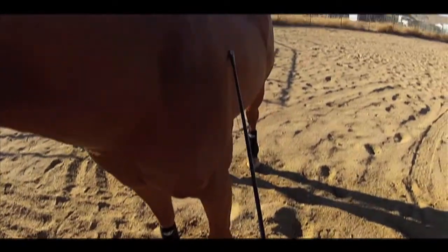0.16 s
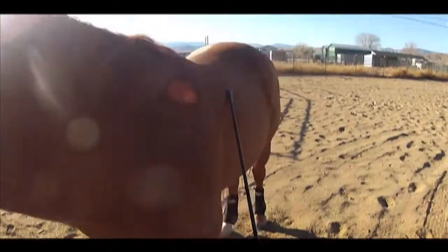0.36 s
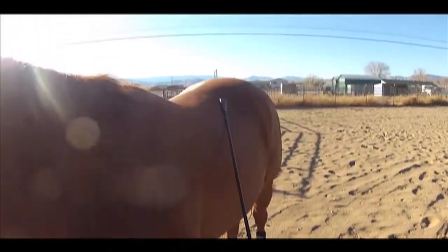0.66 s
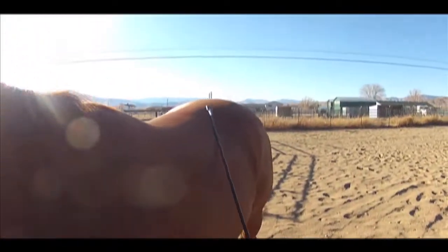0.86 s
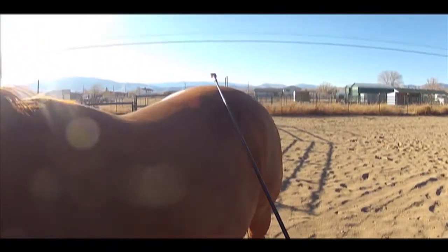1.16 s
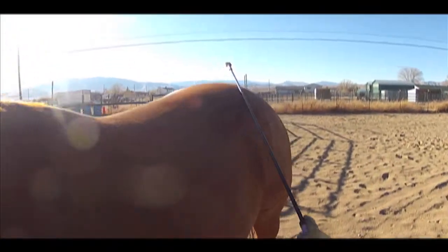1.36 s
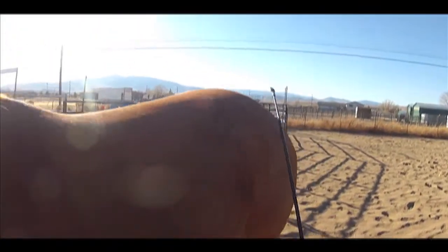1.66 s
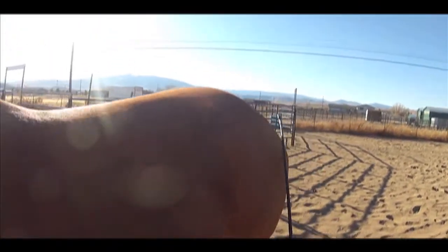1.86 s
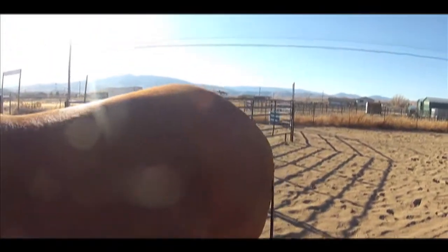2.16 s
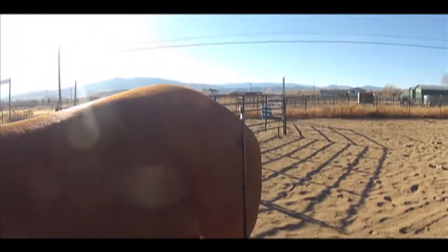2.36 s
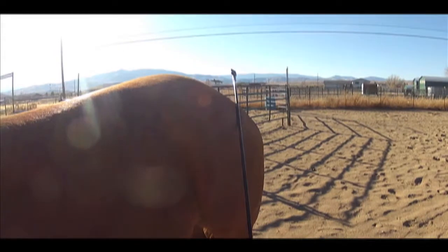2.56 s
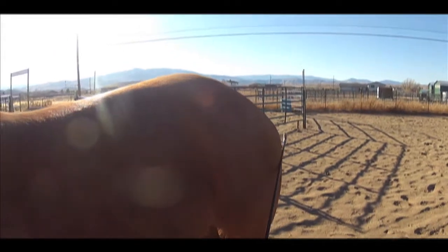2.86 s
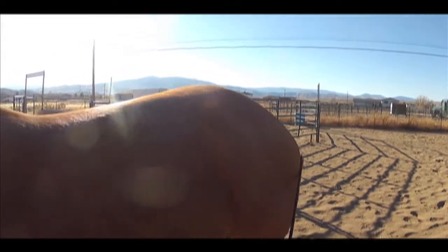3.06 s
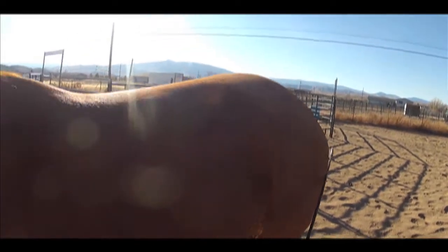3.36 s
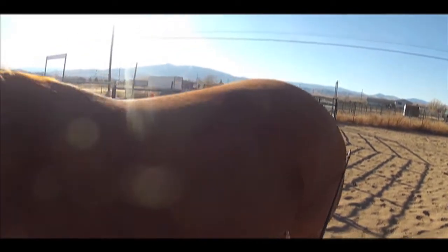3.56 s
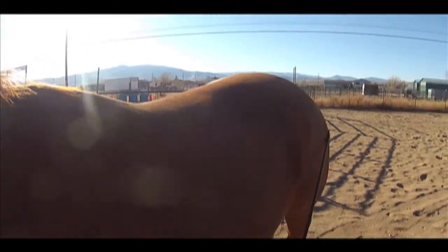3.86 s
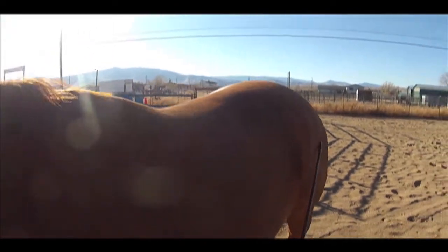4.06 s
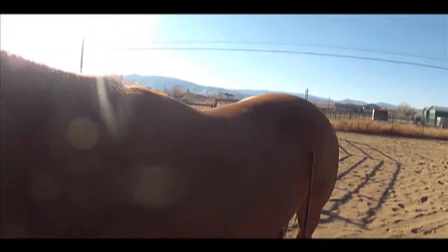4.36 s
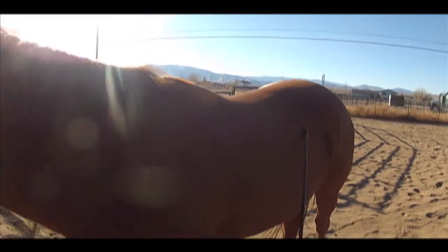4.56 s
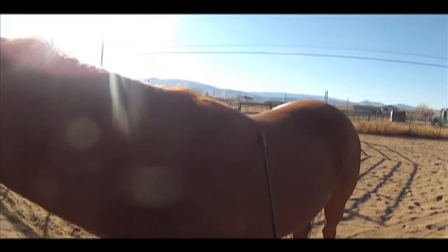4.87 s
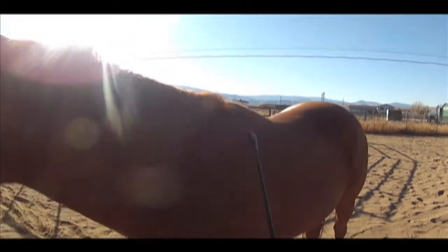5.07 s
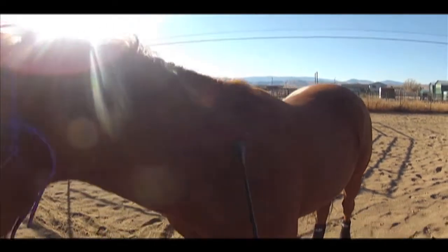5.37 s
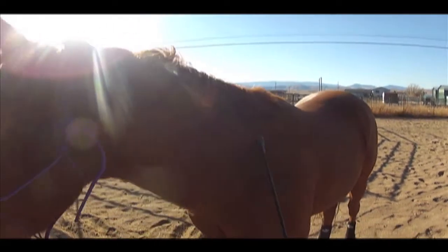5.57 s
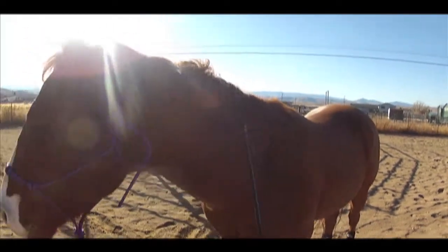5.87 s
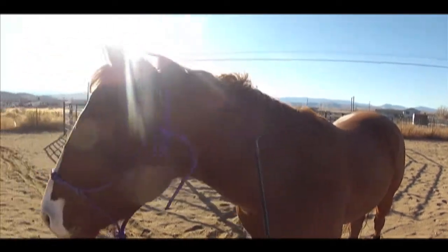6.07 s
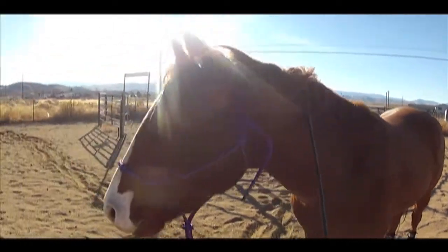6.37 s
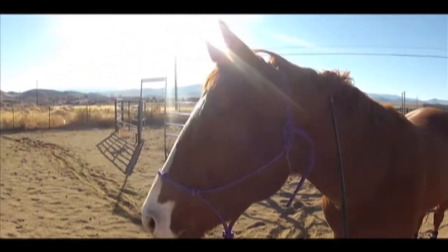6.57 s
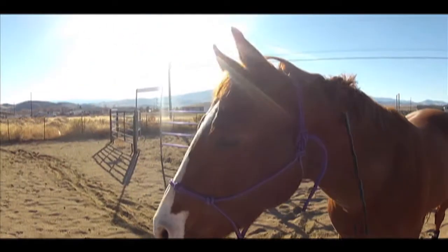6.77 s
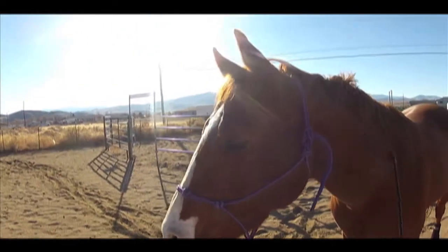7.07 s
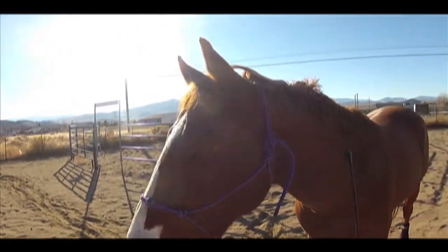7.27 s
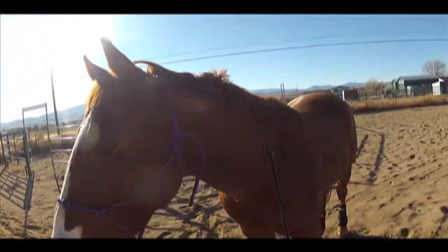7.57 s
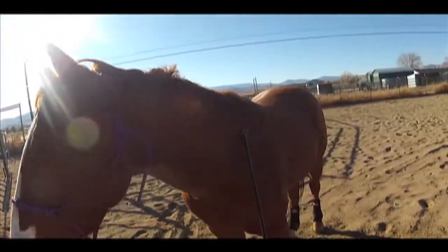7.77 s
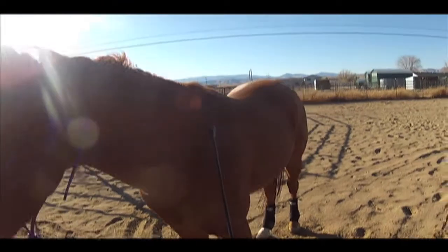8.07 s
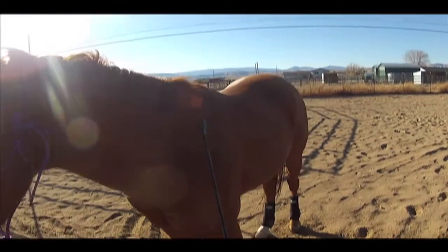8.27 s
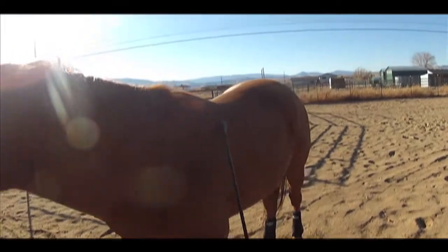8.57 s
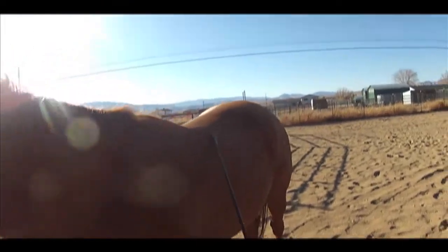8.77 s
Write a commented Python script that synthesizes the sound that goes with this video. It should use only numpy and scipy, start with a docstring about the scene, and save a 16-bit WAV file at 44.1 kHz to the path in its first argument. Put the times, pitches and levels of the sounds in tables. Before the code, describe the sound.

Low wind rumble and muffled thumps come in uneven gusts, while a horse's halter clicks faintly over a steady hiss.

```python
"""Gusty wind buffets the microphone port of a small camera in a closed case, out in a sandy arena.
The strongest eddies strike the microphone as dull thuds, perhaps with a hoof among them.
A horse shifts about close by, knocks come through the case, and the halter's metal clicks.
Far off are a chipping bird and faint rasps; a few soft tones sound over a steady hiss.
The camera holds each sample of a slow converter, which mirrors the sound into the treble."""
import numpy as np
from scipy import signal
from scipy.fft import rfft, irfft, next_fast_len
from scipy.ndimage import uniform_filter1d, map_coordinates
import sys
import numpy as np
from scipy import signal
from scipy.fft import rfft, irfft, next_fast_len
from scipy.io import wavfile
from scipy.ndimage import uniform_filter1d, map_coordinates

SR = 44100
rng = np.random.default_rng(int(sys.argv[2]) if len(sys.argv) > 2 else 0)


def master(y):
    """Save y as 16-bit WAV."""
    cut = np.clip(np.atleast_2d(y).T, -1, 1)
    pcm = np.round(cut * 32767)  # scale
    wavfile.write(sys.argv[1], SR, pcm.astype(np.int16))


N = 393813
TIME = np.arange(N) / SR


def amp(db):
    """Decibels to gain."""
    return 10 ** (np.asarray(db) / 20)


def unit(x):
    """x scaled to rms 1."""
    return x / np.sqrt(np.mean(x ** 2) + 1e-20)


def wobble(rate):
    """A smooth random curve, rate knots a second."""
    return map_coordinates(rng.standard_normal(int(N * rate / SR) + 4), [TIME * rate])


def filtered(x, response):
    """x weighted by response, a gain for each frequency in Hz."""
    size = next_fast_len(N + SR // 2)
    return irfft(rfft(x, size) * response(np.fft.rfftfreq(size, 1 / SR)), size)[:N]


def coloured(x, spectrum):
    """x shaped by (Hz, dB) points on a log axis, at rms 1."""
    freqs, db = np.transpose(spectrum)
    return unit(filtered(x, lambda hz: amp(np.interp(np.log(hz + 1), np.log(freqs), db, right=-200))))


def steady(x, size, share):
    """Evens out a share of a noise's chance swells over size samples, at rms 1."""
    power = np.abs(uniform_filter1d(x ** 2, size=size))
    return unit(x / (power + 0.12) ** (share / 2))


def add(track, start, sound):
    """Mixes a sound into the track at start seconds, or at 0 if that is negative."""
    part = track[max(round(start * SR), 0):][:len(sound)]
    part += sound[:len(part)]


# Gusts at the microphone. Each row: time in seconds, wind strength in dB.
GUST_CURVE = [(0, -22), (.18, -15.5), (.52, -18.5), (.58, -28), (.94, -32), (1.02, -18.5), (1.3, -23.5),
              (1.35, -28), (1.6, -23), (1.68, -30.5), (1.93, -30.5), (2.1, -39.5), (2.26, -32.5),
              (2.7, -44.5), (2.9, -35), (3.32, -44.5), (3.41, -34), (3.84, -36.5), (3.92, -46),
              (4.08, -40.5), (4.5, -26), (4.65, -36), (4.88, -27.5), (4.98, -39.5), (5.53, -29), (5.6, -25),
              (5.9, -20), (6.2, -27.5), (6.55, -33), (7.0, -29), (7.84, -27.5), (7.98, -12), (8.3, -14.5),
              (8.539, -20), (8.62, -34), (8.93, -30.5)]
# Rumble of the large eddies. Each row: frequency in Hz, relative level in dB.
BUFFET_SPECTRUM = [(12, -27.5), (25, -10), (55, -1), (110, -3.5), (170, -9.5), (260, -25.5), (500, -64),
                   (900, -120)]
# Flutter of the small eddies. Each row: frequency in Hz, relative level in dB.
FLUTTER_SPECTRUM = [(60, -53.5), (150, 0), (220, 0.5), (330, -7.5), (500, -21), (700, -30), (950, -50.5),
                    (1400, -53), (2500, -120)]


def wind():
    """Eddies strike the microphone port in lumps; small quick ones flutter on top of large slow ones."""
    eddy_depth_db, breeze_db, breeze_flutter_db, flutter_floor_db = 1.27, -30, -43, -55
    flutter_growth = 1.36  # dB per dB of wind
    lumps = wobble(35)
    buffet_db = np.interp(TIME, *np.transpose(GUST_CURVE)) + eddy_depth_db * wobble(17)
    flutter_db = breeze_flutter_db + flutter_growth * (buffet_db - breeze_db) + 1.3 * wobble(22)
    buffet = coloured(amp(2.0 * lumps) * rng.standard_normal(N), BUFFET_SPECTRUM)
    flutter = coloured(amp(1.9 * lumps + 2.9 * wobble(80)) * rng.standard_normal(N), FLUTTER_SPECTRUM)
    stirred_buffet, stirred_flutter = stirred_air()
    buffet_gain = np.sqrt(amp(buffet_db) ** 2 + stirred_buffet)
    flutter_gain = np.sqrt(amp(flutter_db) ** 2 + amp(flutter_floor_db) ** 2 + stirred_flutter)
    pressure = buffet_gain * steady(buffet, size=2600, share=0.46)
    pressure += flutter_gain * steady(flutter, size=2000, share=0.49)
    power = uniform_filter1d(pressure ** 2, size=1500)
    skew = (pressure ** 2 - power) / np.sqrt(np.abs(power) + 1e-12)  # pushes peak sharper than pulls
    return pressure + 0.15 * skew


# Distant air and the camera's circuit hiss. Each row: frequency in Hz, relative level in dB.
HISS_SPECTRUM = [(150, -26), (400, 4), (700, -0.5), (1100, -8), (1700, -10.5), (3000, -13), (4700, -15.5),
                 (5500, -19), (5950, -29.5)]


def hiss():
    """Far air and circuit noise make a steady bed that breathes a little."""
    level_db = -56 + 0.27 * wobble(1.6)
    return amp(level_db) * coloured(rng.standard_normal(N), HISS_SPECTRUM)


# Dull thuds as the strongest eddies strike the microphone, perhaps a hoof among them.
# Each row: centre in seconds, level in dB, width of the push in ms.
WIND_THUDS = [(0.142, -6, 1.84), (0.2102, -1, 2.7), (0.359, -0.5, 2.5), (0.5003, 0, 1.85),
              (0.664, -11, 2.1), (1.0433, -1.5, 1.83), (1.736, -10.5, 4.7), (1.2387, -0.5, 3.4),
              (1.4188, 2.5, 2.48), (1.58, -8, 4.8), (1.8277, -5, 1.57), (2.2012, -10.5, 3.5),
              (2.8592, -16, 4.4), (2.9293, -18, 5.4), (3.0106, -11, 3.2), (3.8358, -17, 5),
              (4.064, -18.5, 5.7), (4.4364, -13, 1.95), (4.9157, -16, 5.6), (5.02, -18, 4.6),
              (5.37, -17, 5.2), (5.5749, -11.5, 2.2), (5.7111, -10.5, 2.4), (5.9399, -9, 3.1),
              (6.1071, -10.5, 3), (6.2148, -12, 3.4), (6.622, -15, 2.7), (6.8356, -5, 3.8),
              (6.9816, -10.5, 2.95), (7.03, -9.5, 3.3), (7.2385, -14, 2.2), (7.407, -6.5, 2.7),
              (8.021, -0.5, 1.8), (8.2923, -3.5, 2), (8.3594, -4.5, 1.48), (8.524, -3, 3.3),
              (8.683, -17, 4.4), (8.858, -15, 3)]


def thuds():
    """Each is one soft push of air with no ring, evened out by a wider, shallower pull around it."""
    track, t = np.zeros(N), np.arange(-SR // 30, SR // 30) / SR
    for centre, db, width_ms in WIND_THUDS:
        push, pull = (np.exp(-4 * np.log(2) * (1000 * t / ms) ** 2) for ms in (width_ms, 3.5 * width_ms))
        add(track, centre + t[0], amp(db) * (push - pull / 3.5))
    return track


def stirred_air():
    """Air stirred around each thud: buffet power and flutter power swell up to it and die after it."""
    rise_s, fall_s, buffet_db, flutter_db = 0.016, 0.031, -16.5, -22.5
    flutter_db_per_ms = -1.5  # wider thuds stir less flutter
    buffet, flutter, t = np.zeros(N), np.zeros(N), np.arange(-SR // 5, SR // 5) / SR
    swell = np.exp(-np.abs(t) / np.where(t < 0, rise_s, fall_s)) ** 2
    for centre, db, width_ms in WIND_THUDS:
        start = centre + t[0]
        heard = swell[max(-round(start * SR), 0):]
        add(buffet, start, amp(db + buffet_db) ** 2 * heard)
        add(flutter, start, amp(db + flutter_db + flutter_db_per_ms * width_ms) ** 2 * heard)
    return buffet, flutter


def lulls(depth=0.29, sigma_s=0.0043):
    """The wind's gain dips for a moment as each thud's push sweeps small eddies away from the port."""
    calm, t = np.zeros(N), np.arange(-SR // 30, SR // 30) / SR
    for centre, *_ in WIND_THUDS:
        add(calm, centre + t[0], depth * np.exp(-.5 * (t / sigma_s) ** 2))
    return 1 - np.clip(calm, 0, 1)


def port_membrane(pressure, limit=0.95, cutoff_hz=1150):
    """The membrane over the port stiffens on the tallest pushes and passes little treble."""
    bent = pressure / (1 + np.abs(pressure / limit) ** 6) ** (1 / 6)
    return filtered(bent, lambda hz: 1 / np.sqrt(1 + (hz / cutoff_hz) ** 4))


def glides(notes):
    """Pure notes that swell, slide and fade."""
    track = np.zeros(N)
    for start, from_hz, to_hz, db, length in notes:
        n = int(length * SR)
        phase = 2 * np.pi * np.cumsum(np.linspace(from_hz, to_hz, n)) / SR
        add(track, start, amp(db) * np.hanning(n) * np.sin(phase))
    return track


# A bird far from the microphone.
# Each row: start in seconds, first and last pitch in Hz, level in dB, length in seconds.
BIRD_CHIPS = [(.511, 2010, 1960, -57.5, 0.023), (5.54, 4150, 4060, -56.5, 0.042),
              (6.045, 4300, 4080, -56, 0.038)]


def bird():
    """A distant bird chips in short, slightly falling whistles."""
    return glides(BIRD_CHIPS)


# Knocks through the case.
# Each row: start in seconds, level in dB, pitch in Hz, relative level of the overtone in dB.
CASE_KNOCKS = [(1.035, -12.5, 438, -12), (1.413, -32, 455, -31), (1.937, -27, 520, -24),
               (3.457, -25, 437, -20), (3.494, -33, 466, -22), (4.427, -27, 490, -24),
               (4.908, -19.5, 640, -36), (5.312, -29, 640, -28), (5.338, -31, 534, -24),
               (6.249, -32.5, 660, -24), (6.291, -29, 560, -24), (7.683, -27, 540, -22),
               (7.859, -22.5, 452, -26), (8.519, -21, 517, -26)]


def knocks(t60_s=0.022, attack_s=0.0015):
    """Short hollow knocks: a damped mode and a shorter overtone from the edge of the blow."""
    track, t = np.zeros(N), np.arange(SR // 10) / SR
    attack = (1 - np.exp(-t / attack_s)) ** 2
    for start, db, hz, overtone_db in CASE_KNOCKS:
        mode = amp(-60 * t / t60_s) * np.sin(2 * np.pi * hz * t)
        overtone = amp(overtone_db - 60 * t / (.7 * t60_s)) * np.sin(2 * np.pi * 2.3 * hz * t)
        add(track, start, amp(db) * (mode + overtone) * attack)
    return track


# The halter, close by. Each row: start in seconds, level in dB, relative level of the treble in dB.
HALTER_CLICKS = [(4.4535, -50, -4), (4.5326, -46.5, -8), (4.539, -36, -8), (4.547, -53, -11),
                 (5.1463, -38.5, -22), (5.217, -42.5, -1.5), (8.821, -44, -1), (8.826, -45, -17),
                 (8.8325, -44.5, -10), (8.8733, -42, -8), (8.877, -50.5, -23), (8.899, -49, -4.5),
                 (8.904, -41.5, -10.5)]
# Modes of its clasp, the treble mode last.
# Each row: frequency in Hz, relative level in dB, time to fall 60 dB in seconds.
CLASP_MODES = [(2720, -6, 0.011), (3075, -1, 0.015), (3480, -3.5, 0.016), (5160, 1.5, 0.0083)]


def halter(crack_t60_s=0.0068, attack_s=0.0005):
    """The metal clasp clicks: a dry crack, and modes whose strength and pitch vary each time."""
    track, t = np.zeros(N), np.arange(SR // 20) / SR
    crack_band = signal.butter(2, [2400, 5800], "band", fs=SR, output="sos")
    attack = 1 - np.exp(-t / attack_s)
    for start, db, treble_db in HALTER_CLICKS:
        modes = []
        for hz, mode_db, t60 in CLASP_MODES:
            chance = rng.standard_normal()
            decay = amp(mode_db + 1.4 * chance - 60 * t / t60)
            modes.append(decay * np.sin(2 * np.pi * hz * (1 + 0.025 * chance) * t))
        noise = signal.sosfilt(crack_band, rng.standard_normal(len(t)))
        crack = amp(11.5 - 60 * t / crack_t60_s) * noise
        treble = amp(treble_db) * (modes[-1] + crack)
        add(track, start, amp(db) * (sum(modes[:-1]) + treble) * attack)
    return track


# Soft tones, faint at the microphone.
# Each row: start in seconds, first and last pitch in Hz, level in dB, length in seconds.
SOFT_HOOTS = [(4.46, 592, 560, -45, 0.035), (4.66, 593, 590, -49.5, 0.052), (4.95, 574, 557, -50, 0.038),
              (5.13, 553, 643, -47.5, 0.087)]


def hoots():
    """Brief pure hoots, each sliding a little in pitch."""
    return glides(SOFT_HOOTS)


# Faint rasps in the distance. Each row: start in seconds, level in dB, length in seconds.
FAR_RASPS = [(5.25, -69, .2), (6.766, -64, .06), (7.692, -63, 0.065), (8.608, -62, 0.11)]
# Their hoarse colour. Each row: frequency in Hz, relative level in dB.
RASP_SPECTRUM = [(1500, -40), (1900, -7), (2300, 0), (2600, -12), (3100, -40)]


def rasps():
    """Short puffs of narrow-band noise swell and fade far off."""
    swell = np.zeros(N)
    for start, db, length in FAR_RASPS:
        add(swell, start, amp(db) * np.hanning(int(length * SR)))
    return swell * coloured(rng.standard_normal(N), RASP_SPECTRUM)


def scene():
    """Everything that reaches the single microphone in the arena."""
    at_port = port_membrane(wind() * lulls() + thuds())
    return (at_port + knocks() + halter() + bird() + hoots() + rasps() + hiss())[None]


def record(dry, converter_hz=12000, top_hz=15350):
    """The camera's sampling mirrors the sound about its rate; holding each sample weights it by a sinc."""
    band = filtered(dry[0], lambda hz: hz < converter_hz / 2)
    mirrored = band * (1 + 2 * np.cos(2 * np.pi * converter_hz * TIME))
    return filtered(mirrored, lambda hz: np.sinc(hz / converter_hz) * (hz < top_hz))[None]


dry = scene()
out = record(dry)
master(out)
```